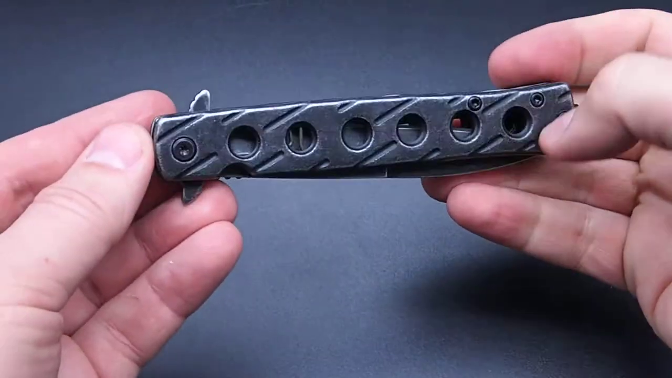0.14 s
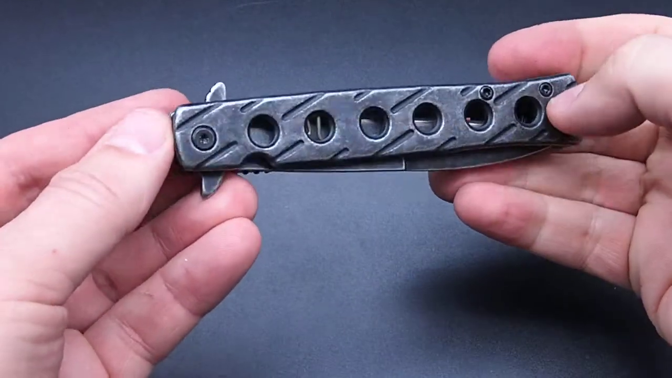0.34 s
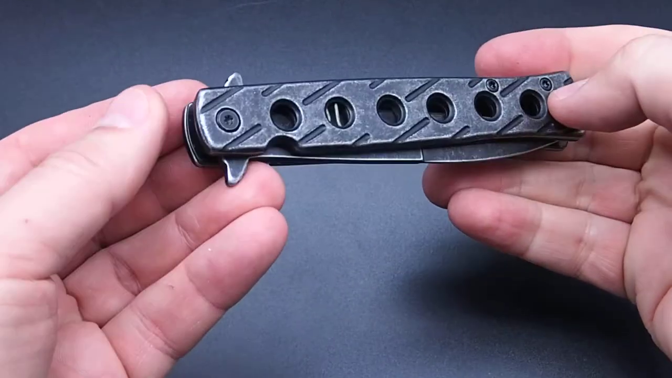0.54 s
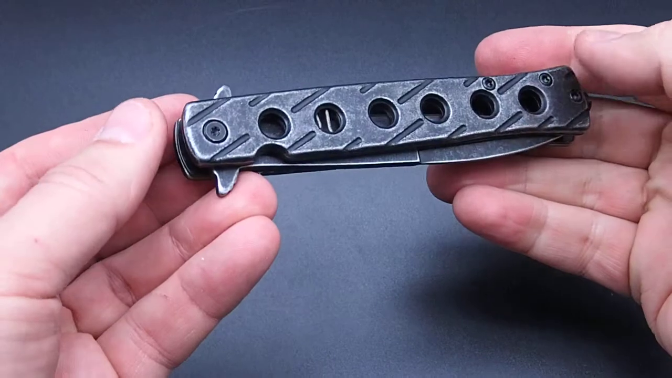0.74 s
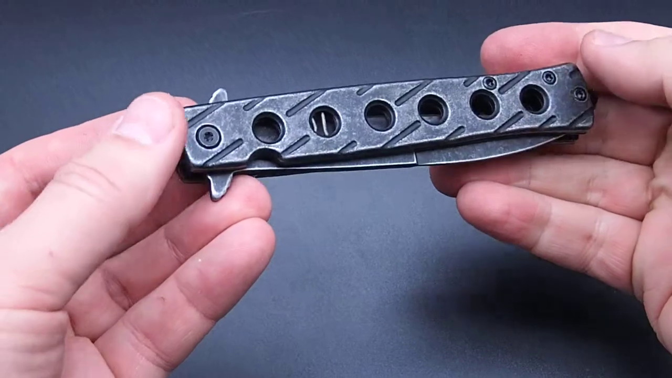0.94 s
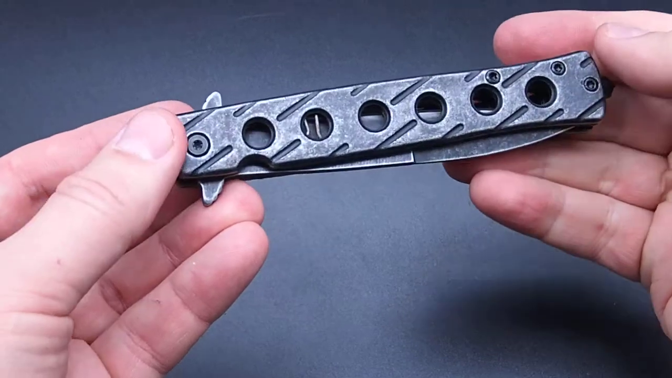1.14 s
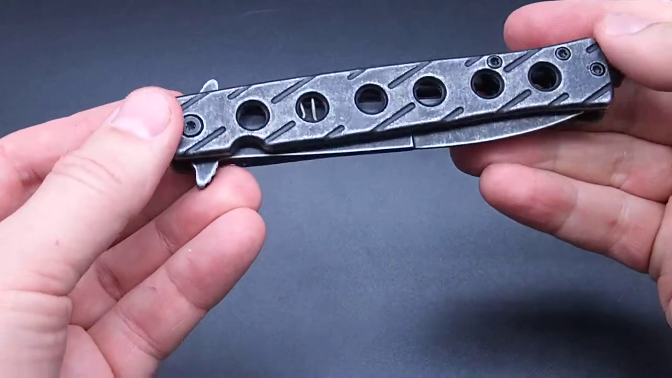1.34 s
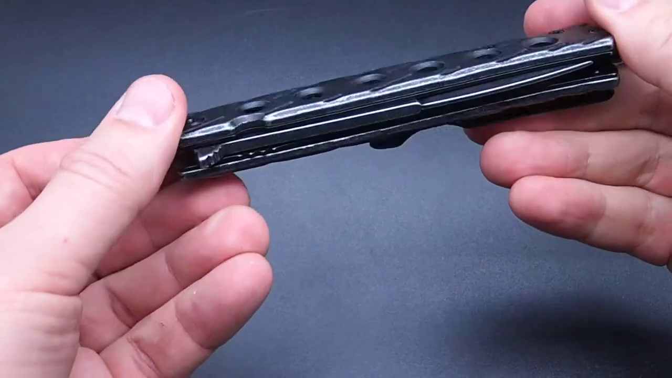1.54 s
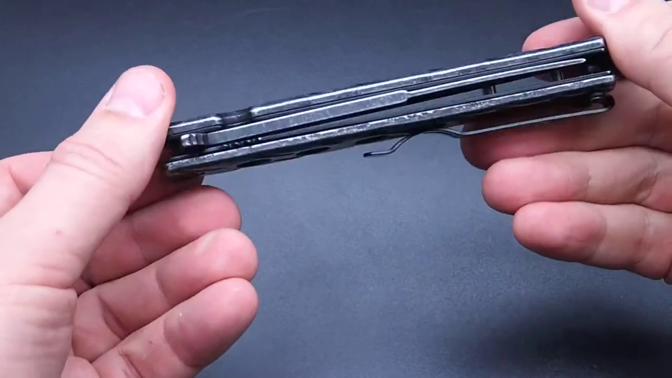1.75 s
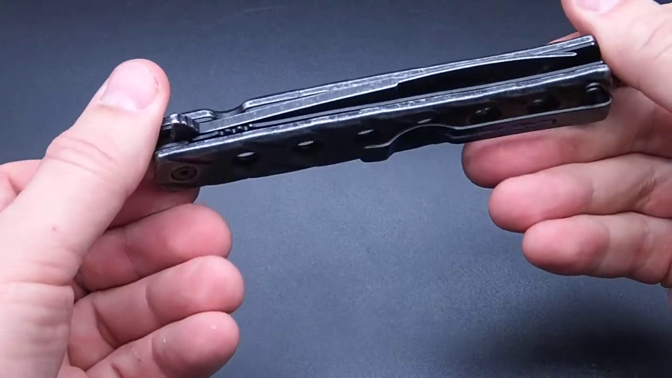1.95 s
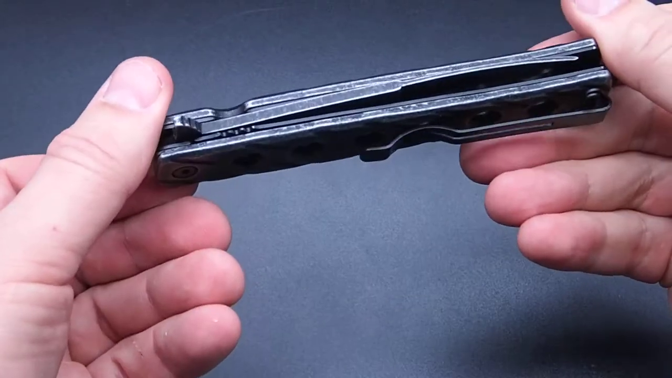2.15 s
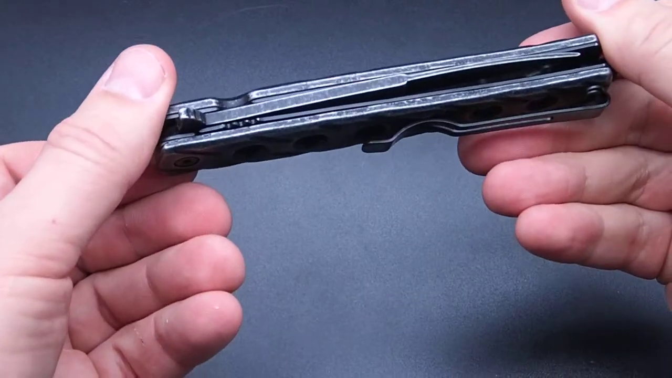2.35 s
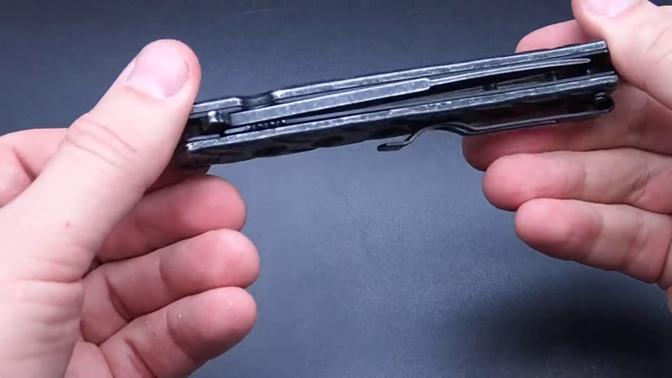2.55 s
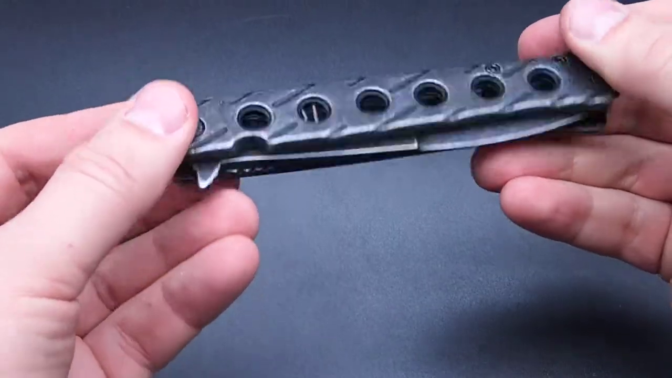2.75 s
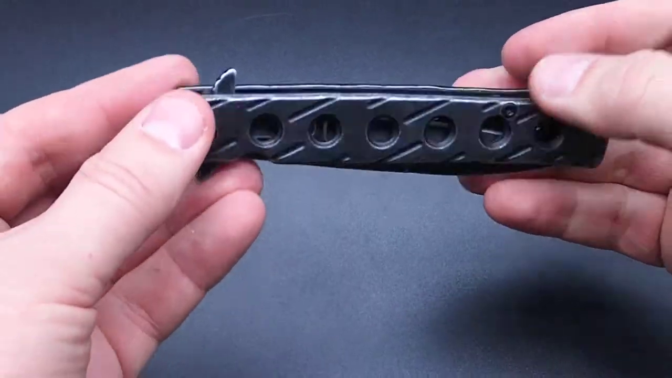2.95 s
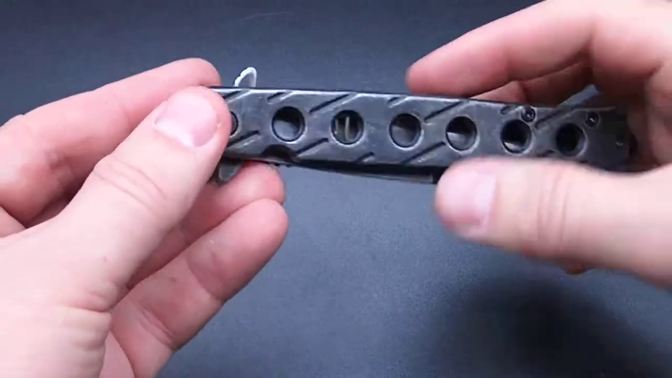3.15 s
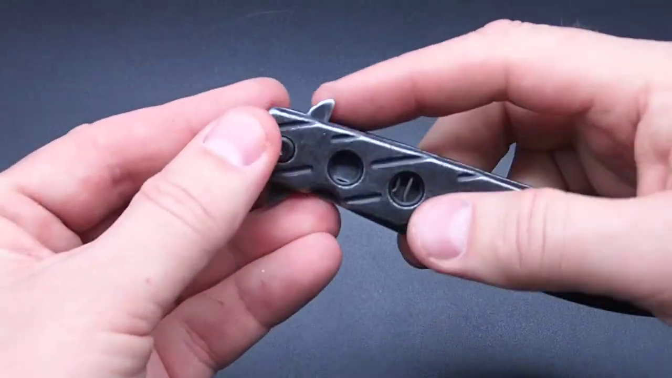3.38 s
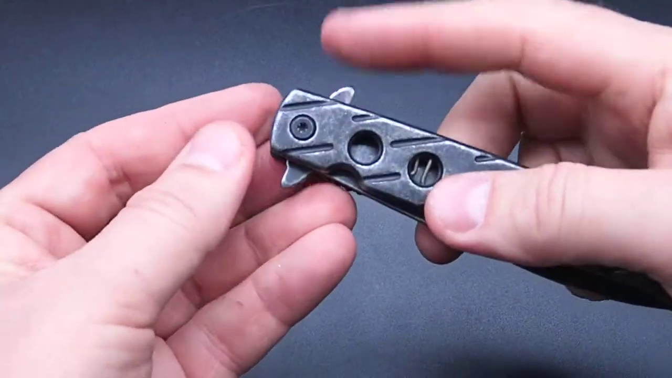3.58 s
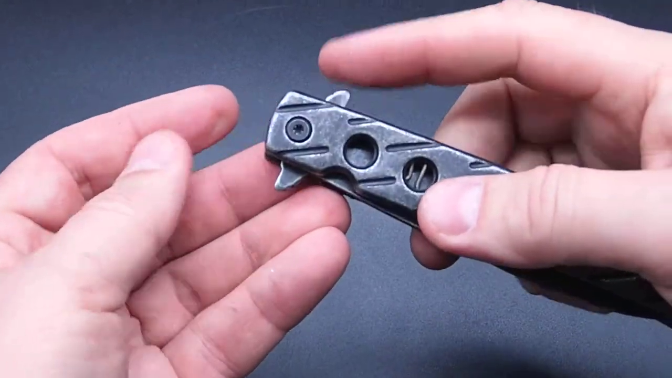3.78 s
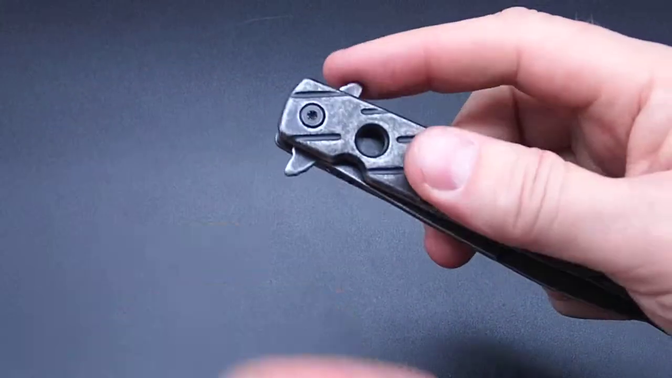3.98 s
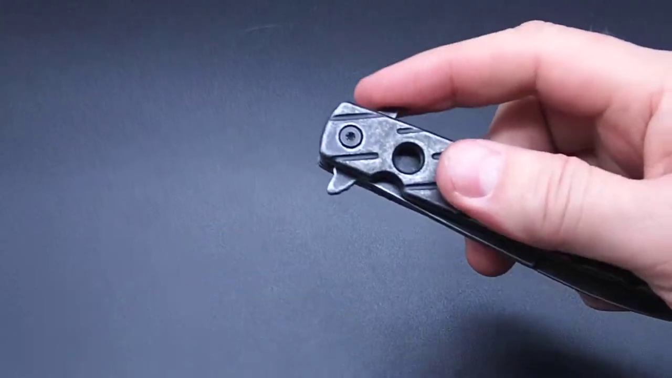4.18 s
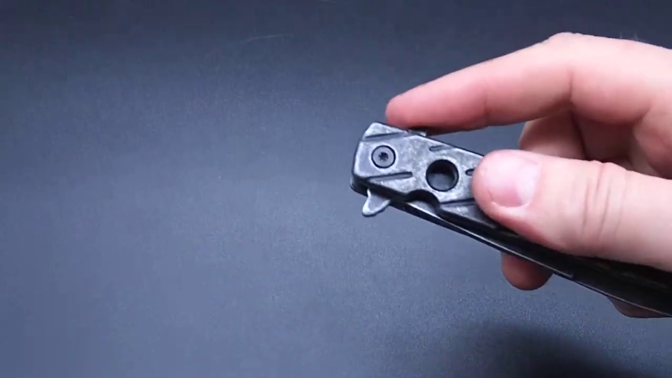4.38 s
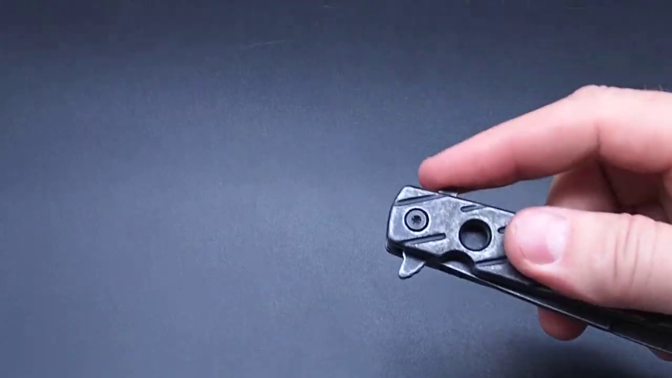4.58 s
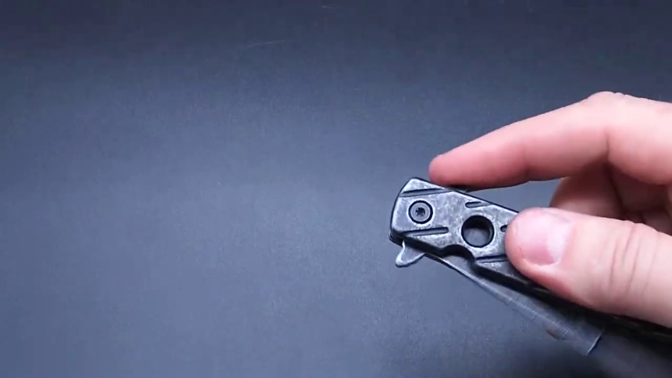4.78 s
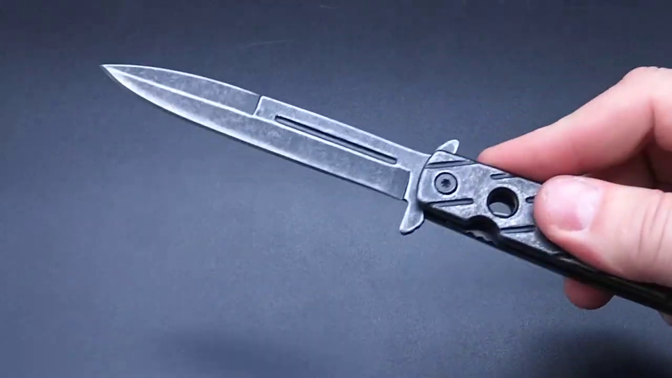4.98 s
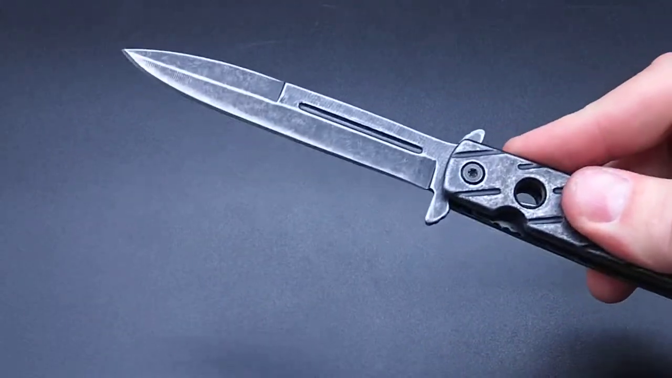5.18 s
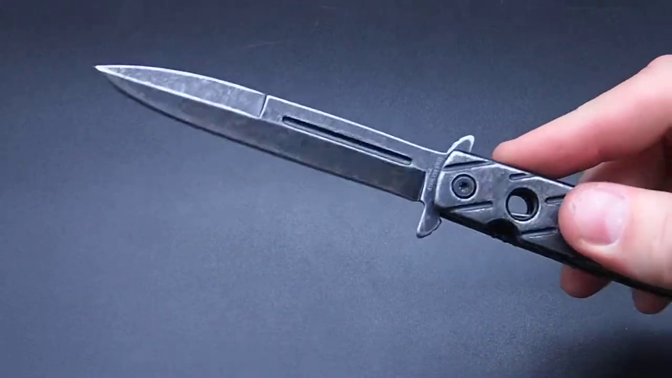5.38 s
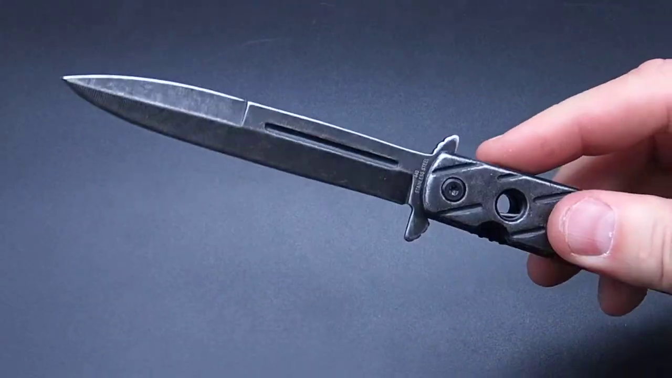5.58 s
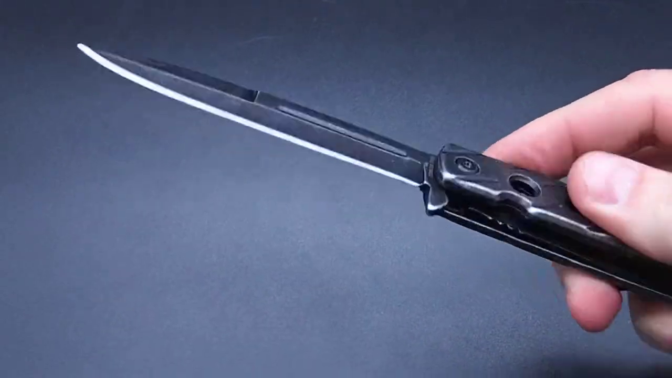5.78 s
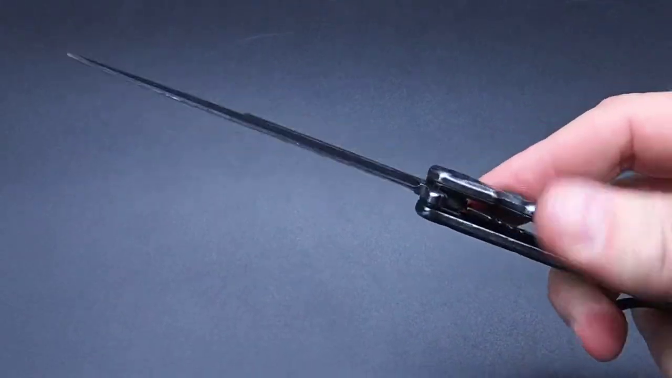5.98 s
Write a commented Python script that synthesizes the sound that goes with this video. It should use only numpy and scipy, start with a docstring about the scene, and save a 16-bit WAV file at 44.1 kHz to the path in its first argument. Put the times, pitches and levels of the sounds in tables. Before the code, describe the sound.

Steady soft room air and microphone hiss, slightly stronger on the left, with thin electronic focus chirps and a faint fluttering whine. A knife frame gives small bright ticks and a grainy rub of skin on steel. Then a rapid double-stage snap: a sharp click, a short scrape of the pivot, and a hard loud clack as the blade locks, with a short high steel ring and close wall echo. Quiet hiss afterwards.

```python
"""In a small dry room, a spring-assisted steel folding knife is turned in the hands close to a camera.
Coloured noise makes room air and microphone hiss; gated sines and a pulsing whisper make the lens motor.
The frame ticks (decaying noise, one short note); a finger, later the swinging blade's pivot, rubs (grainy noise).
The spring trips and the blade snaps into its lock: filtered pulses, noise bursts and decaying steel modes.
A near wall echoes the knife; the gain control ducks after loud peaks."""
import sys
import numpy as np
from scipy import signal
from scipy.fft import rfft, irfft, next_fast_len
from scipy.io import wavfile
from scipy.ndimage import uniform_filter1d

SR = 44100
rng = np.random.default_rng(int(sys.argv[2]) if len(sys.argv) > 2 else 0)


def digitize_waveform(pressure):
    """Quantize a signal to 16-bit integers and store it at the path in sys.argv[1].

    Rows of a 2-D input are taken as channels; values are limited to [-1, 1].
    """
    field = np.atleast_2d(pressure).T
    bounded = np.clip(field, -1, 1)
    quanta = np.round(bounded * 32767).astype(np.int16)
    wavfile.write(sys.argv[1], SR, quanta)


N = 265658

# spectrum of the knife frame under light contact: (frequency [Hz], relative level [dB])
FRAME_COLOUR = [(300, -38), (1400, -17), (2200, -15), (3000, -13), (4200, -17.5), (5200, 0.5), (5700, 0.5),
                (6500, -6.5), (8200, -3.5), (9800, -20), (15500, -24)]


def amp(db):
    """Decibels to gain."""
    return 10 ** (np.asarray(db) / 20)


def unit(x):
    """Scale to rms 1."""
    return x / np.sqrt(np.mean(x ** 2) + 1e-20)


def along(points, hz):
    """Interpolate (Hz, value) points on a log frequency axis."""
    f, v = np.transpose(points)
    return np.interp(np.log(hz + 1), np.log(f + 1), v)


def filtered(x, response):
    """Multiply the spectrum of x by a response of frequency."""
    n = x.shape[-1]
    padded = next_fast_len(n + 8192)
    hz = np.fft.rfftfreq(padded, 1 / SR)
    return irfft(rfft(x, padded) * response(hz), padded)[..., :n]


def colour(points, tilt_db=0):
    """Gain of a spectrum tilted (dB per octave) about 5600 Hz; the tilt is constant below 4000 Hz."""
    return lambda hz: amp(along(points, hz) + tilt_db * np.log2(np.maximum(hz, 4000) / 5600))


def resonance(hz, centre_hz, width_hz):
    """Causal response of one resonance, 1 at its centre."""
    return 1j * hz * width_hz / (centre_hz ** 2 - hz ** 2 + 1j * hz * width_hz)


def add(track, s, sound):
    """Mix a sound in at time s."""
    part = track[:, round(s * SR):][:, :sound.shape[-1]]
    part += sound[..., :part.shape[-1]]


def spread(n):
    """Two white noises with a shared part, alike in the midrange and nearly unrelated in the treble."""
    # knife's diffuse sound: (frequency [Hz], side over mid [ratio])
    width = [(1000, 0.28), (5500, 0.27), (8000, 0.47), (13000, .95)]
    mid, side = rng.standard_normal((2, n))
    side = filtered(side, lambda hz: along(width, hz))
    return unit(np.array([mid + side, mid - side]))


def background():
    """Room air and microphone hiss: steady noise, stronger on the left, partly shared by the ports."""
    # (frequency [Hz], relative level [dB])
    air_colour = [(20, -22), (60, -6), (150, -1), (400, -0.5), (1000, -3), (1500, -5.5), (2200, -11.5),
                  (2700, -14), (4000, -16.5), (5000, -10), (6500, -9.5), (8000, -4.5), (9300, -11.5),
                  (15500, -13.5)]
    # (frequency [Hz], left-right correlation [-1..1])
    likeness = [(40, 0.42), (200, 0.16), (1000, 0.018), (4000, 0.13), (12000, 0)]
    # (frequency [Hz], left minus right [dB])
    lean = [(40, 2.5), (300, 4), (4000, 3.5), (8000, 2), (15000, 2)]

    def mid_side_gain(hz):
        angle = np.arccos(np.clip(along(likeness, hz), -1, 1)) / 2
        return amp(along(air_colour, hz)) * [np.cos(angle), np.sin(angle)]

    mid, side = filtered(rng.standard_normal((2, N)), mid_side_gain)
    pair = np.array([mid + side, mid - side])
    pair = filtered(pair, lambda hz: amp(along(lean, hz) * [[.5], [-.5]]))
    return amp(-51.5) * unit(pair)


def lens_motor():
    """The focus motor chirps at each step and whispers once a picture frame, near-opposed at the ports."""
    # focus steps, each moved to a fixed moment of its picture frame: time [s]
    focus_s = [.02, .45, .48, .65, 1.02, 1.12, 1.42, 1.52, 1.69, 1.79, 1.82, 1.92, 2.02, 2.09, 2.42, 2.65,
               2.69, 2.89, 2.99, 3.22, 3.39, 4.02, 4.19, 4.22, 4.32, 4.45, 4.62, 4.72, 5.59, 5.76, 5.86]
    frame_hz, focus_phase_s = 29.97, 0.01715
    step_s, pitch_hz = .026, 6160
    t = np.arange(N) / SR
    step_t = np.arange(int(step_s * SR)) / SR
    chirp = np.sin(2 * np.pi * pitch_hz * step_t) * signal.windows.tukey(len(step_t), .25)
    motor = np.zeros((1, N))
    for s in focus_s:
        frame_start_s = np.floor(s * frame_hz) / frame_hz
        add(motor, frame_start_s + focus_phase_s, amp(-45) * chirp)
    beat = .5 + .5 * np.cos(2 * np.pi * frame_hz * (t - .014))
    whisper = unit(filtered(rng.standard_normal(N), lambda hz: 1 / (1 + ((hz - 6270) / 260) ** 2)))
    motor += amp(-57) * beat ** 1.3 * whisper
    # 0.21 rad lead on the left, lag on the right, at the pitch
    lag = lambda hz: np.exp(np.array([[1j], [-1j]]) * 0.21 * hz / pitch_hz)
    return filtered(motor * [[1], [-1]], lag)


def clatter(gain, stretch):
    """Dense ringing: noise scaled to rms 1, then decayed at its own rate in each band."""
    # knife and near surfaces: (frequency [Hz], t60 before stretch [s])
    ring_time = [(300, 0.13), (1100, 0.096), (3000, 0.12), (5600, 0.11), (9000, 0.095), (15000, 0.091)]
    noise = unit(filtered(spread(SR // 4), gain))
    hz, t, bands = signal.stft(noise, SR, nperseg=128)
    t60 = stretch * along(ring_time, hz)[:, None]
    decayed = signal.istft(bands * amp(-60 * t / t60), SR, nperseg=128)[1]
    return decayed[:, :SR // 4]


def steel_ring(modes, phase_spread):
    """Decaying sine modes, new strengths each call, phases a little different at each port."""
    t = np.arange(SR // 4) / SR
    ring = np.zeros((2, len(t)))
    for hz, db, t60 in modes:
        phase = rng.uniform(0, 2 * np.pi) + phase_spread * rng.standard_normal((2, 1))
        level_db = db + rng.standard_normal()
        ring += amp(level_db - 60 * t / t60) * np.sin(2 * np.pi * hz * t + phase)
    return ring * (1 - np.exp(-t / 0.00037))  # soft onset


def ticks():
    """Light contacts, dulled by the hand: short clatter plus one note of the part that touches."""
    # frame, flipper and spring: (time [s], clatter level [dB], note [Hz], mean note level [dB])
    contacts = [(1.794, -55, 5100, -52), (2.8992, -41, 5540, -39), (2.902, -49, 8300, -44),
                (2.904, -52, 7520, -42), (3.0465, -47, 5420, -48), (4.166, -45.5, 5680, -49),
                (4.652, -44, 5070, -45.5), (4.7615, -48.5, 5080, -46.5), (4.793, -48, 5780, -39),
                (4.798, -51, 6350, -42), (4.815, -52, 6350, -36), (5.446, -56, 5520, -62)]
    out = np.zeros((2, N))
    for s, db, note_hz, note_db in contacts:
        add(out, s, amp(db) * clatter(colour(FRAME_COLOUR, tilt_db=-3), stretch=0.91))
        add(out, s, steel_ring([(note_hz, note_db, .07)], phase_spread=0.35))
    return out


def pressure():
    """Each stroke swells and lets go in a bell shape; strokes that overlap add in power."""
    # finger on the frame, then the blade's pivot rubbing as it swings (last two):
    # (firmest time [s], level [dB], rise [s], fall [s])
    strokes = [(2.8, -68, .15, .25), (3.2, -60.5, 0.044, 0.19), (4.12, -50.5, 0.17, 0.15),
               (4.58, -66, .2, .25), (4.83, -52, .025, .03), (4.94, -47, 0.043, .025)]
    t = np.arange(N) / SR
    power = np.zeros(N)
    for s, db, rise_s, fall_s in strokes:
        span_s = np.where(t < s, rise_s, fall_s)
        bell = np.exp(-((t - s) / span_s) ** 2)
        power += (amp(db) * bell) ** 2
    return np.sqrt(power)


def rubs():
    """Skin or pivot slides on steel: noise in fine random grains, coloured by the frame."""
    grain_db = 1.9  # rms of the level variation
    grain = amp(grain_db * unit(uniform_filter1d(rng.standard_normal(N), size=90)))
    rub = unit(filtered(grain * spread(N), colour(FRAME_COLOUR, tilt_db=-3.5)))
    return pressure() * rub


def impulse(gain, size=2048):
    """Minimum-phase (causal) pulse with this spectrum, scaled to peak 1."""
    cepstrum = irfft(np.log(gain(np.fft.rfftfreq(size, 1 / SR)) + 1e-6))
    cepstrum[1:size // 2] *= 2
    cepstrum[size // 2 + 1:] = 0
    pulse = irfft(np.exp(rfft(cepstrum)))
    return pulse / np.abs(pulse).max()


def chatter(gain, t60):
    """Faces grind together for a few milliseconds as they meet: a fast-decaying noise burst."""
    t = np.arange(SR // 20) / SR
    return unit(filtered(spread(len(t)), gain)) * amp(-60 * t / t60)


def blade():
    """Each blow is a sharp crack, its quick rebound, a bright chatter and the ring of the steel."""
    # spring trips, blade swings and locks:
    # (time [s], ring reference level [dB], crack level [dB], treble tilt [dB per octave])
    blows = [(4.8207, -40.5, -30, 1), (4.8265, -36, -25, -1), (4.841, -24.5, -18, 7),
             (4.8437, -29, -12, -1), (4.8479, -32, -17, 3.5), (4.883, -42.5, -42, 7), (4.914, -45, -40, -1),
             (4.918, -37, -35, -5), (4.9229, -30.5, -19, -7), (4.9395, -23.5, -15, -0.5),
             (4.942, -20.5, -0.8, 0.5), (4.9460, -30, -22, 8)]
    # chatter and clatter spectrum: (frequency [Hz], relative level [dB])
    clash_colour = [(200, -48), (750, -33), (1130, -15), (1700, -26), (2300, -20), (3200, -20.5),
                    (3900, -15.5), (4500, -9.5), (5700, 2.5), (6800, -7.5), (8300, -5.5), (10200, -14),
                    (11300, -18.5), (15500, -19)]
    # crack spectrum: (frequency [Hz], relative level [dB])
    crack_colour = [(200, -48), (1100, -26), (2300, -23.5), (3200, -21.5), (4000, -11.5), (5000, -1.5),
                    (5600, 2.5), (6800, -2), (8000, -8.5), (11000, -21), (15500, -21)]
    # modes, blade inside the handle: (frequency [Hz], mean relative level [dB], t60 [s])
    shut_modes = [(1115, -17.5, 0.1), (1222, -17.5, 0.058), (4490, -5.5, 0.051), (4520, -8, 0.038),
                  (5700, -4, .09), (5800, -2, 0.06), (5800, -6, 0.053), (6270, -7, 0.069),
                  (8070, -3, 0.077), (8040, -12, .08), (8660, -6, 0.059), (9400, 0, 0.037),
                  (10180, -9, .05), (13030, -14, .045), (14650, -15, .05)]
    # modes, blade out: (frequency [Hz], mean relative level [dB], t60 [s])
    open_modes = [(1001, -22, .14), (4564, -12, .08), (4715, -12, .08), (5019, -12, .09), (5130, -11, .09),
                  (5240, -11, .08), (5348, -9, .07), (5469, -1, .055), (5655, -9, .16), (5832, -3, .085),
                  (5934, -4, .09), (6208, -4, .08), (6629, -5, .1), (7011, -7, .085), (7410, -14, .08),
                  (7970, -12, .07), (8250, -10, .075), (9412, -16, .07), (14500, -22, .07)]
    clear_s = 4.9  # from here on the blade stands clear of the handle
    # the crack's pitch sinks as the blade leaves the handle
    crack_shut_hz, crack_open_hz, swing_s = 6400, 5480, .04
    rebound_s = .00073
    out = np.zeros((2, N))
    for s, ring_db, crack_db, tilt_db in blows:
        swing = np.exp((blows[0][0] - s) / swing_s)
        pitch_hz = crack_open_hz + (crack_shut_hz - crack_open_hz) * swing

        def crack_gain(hz):
            peak = np.abs(1 + 2.1 * resonance(hz, pitch_hz, width_hz=250))
            return colour(crack_colour, tilt_db)(hz) * peak

        crack = amp(crack_db) * impulse(crack_gain)
        add(out, s, crack)
        add(out, s + rebound_s, 0.16 * crack)
        add(out, s, amp(crack_db - 24) * chatter(colour(clash_colour, tilt_db + 10), t60=.014))
        add(out, s, amp(ring_db - 3.5) * clatter(colour(clash_colour, tilt_db), stretch=1.03))
        modes = shut_modes if s < clear_s else open_modes
        add(out, s, amp(ring_db - 4.5) * steel_ring(modes, phase_spread=0.36))
    return out


def scene():
    """The knife is louder at the left port and reaches the right slightly sooner; a near wall answers."""
    sides = np.array([[.5], [-.5]])
    # left minus right: 3 dB, and 0.35 rad of delay at 5600 Hz
    placing = lambda hz: amp(3.0 * sides) * np.exp(-1j * sides * 0.35 * hz / 5600)
    knife = filtered(blade() + ticks() + rubs(), placing)
    wall_s = np.array([[.0091], [.0137]])  # echo delay at each port
    echo = filtered(knife, lambda hz: amp(-18) * np.exp(-2j * np.pi * hz * wall_s))
    return knife + echo + lens_motor() + background()


def gain_control(x, threshold_db, react_s, release_s):
    """A peak over the threshold pulls the gain down a moment later; it then creeps back."""
    t = np.arange(N) / SR
    peak_db = 20 * np.log10(np.abs(x).max(axis=0) + 1e-9)
    over_db = np.maximum(peak_db - threshold_db, 1e-9)
    # peak hold with exponential release, computed in logs
    held_db = np.exp(np.maximum.accumulate(np.log(over_db) + t / release_s) - t / release_s)
    delayed_db = np.interp(t - react_s, t, held_db)
    return x * amp(-uniform_filter1d(delayed_db, size=128))


def record(dry):
    """Housing dips, gain control, a soft ceiling and the camera's band limit."""
    # dips of the microphone housing: (centre [Hz], width [Hz], depth [0..1])
    dips = [(1872, 193, 0.68), (2610, 500, 0.54), (3470, 186, 1), (3915, 310, 0.78), (4250, 134, 1),
            (4870, 58, 1)]
    top_hz, ceiling = 15800, .93

    def housing(hz):
        return np.prod([1 - np.clip(depth, 0, 1) * resonance(hz, c, w) for c, w, depth in dips], axis=0)

    ducked = gain_control(filtered(dry, housing), threshold_db=-5.0, react_s=.018, release_s=0.11)
    rounded = ducked / (1 + np.abs(ducked / ceiling) ** 8) ** (1 / 8)
    return filtered(rounded, lambda hz: hz < top_hz)


dry = scene()
out = record(dry)
digitize_waveform(out)
```